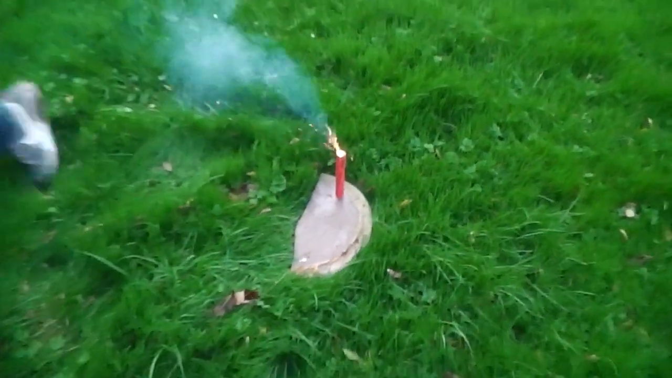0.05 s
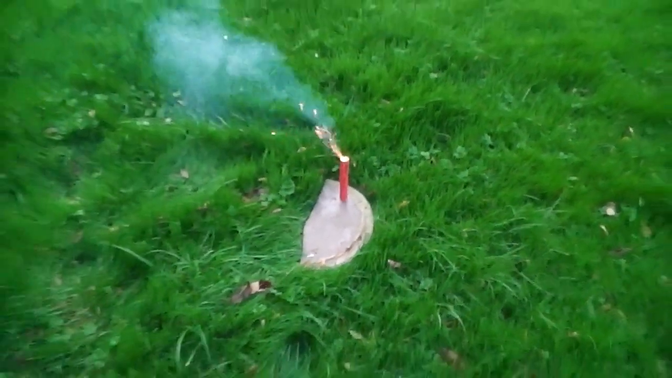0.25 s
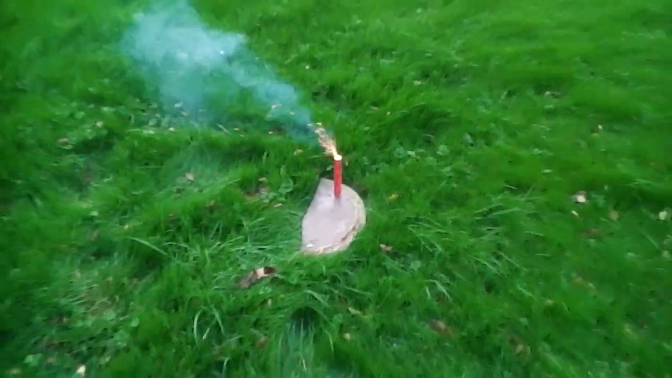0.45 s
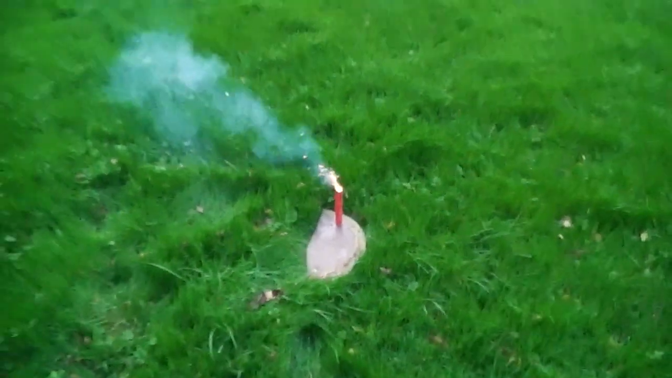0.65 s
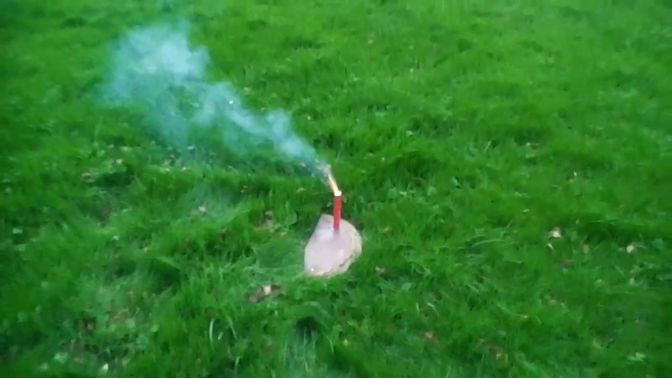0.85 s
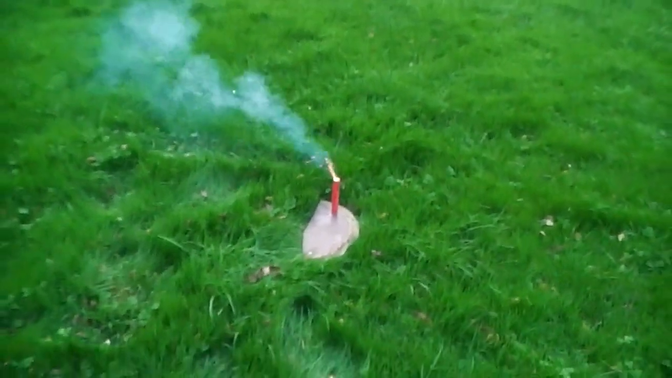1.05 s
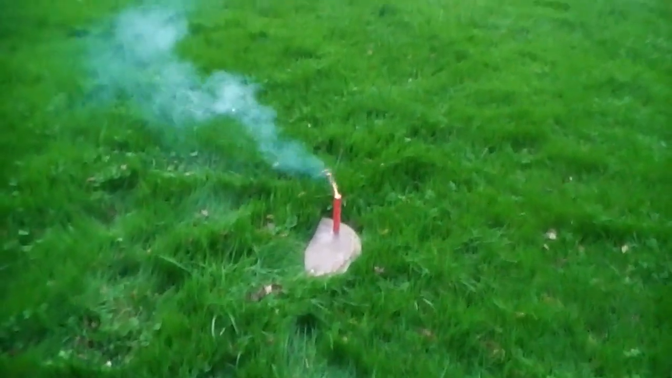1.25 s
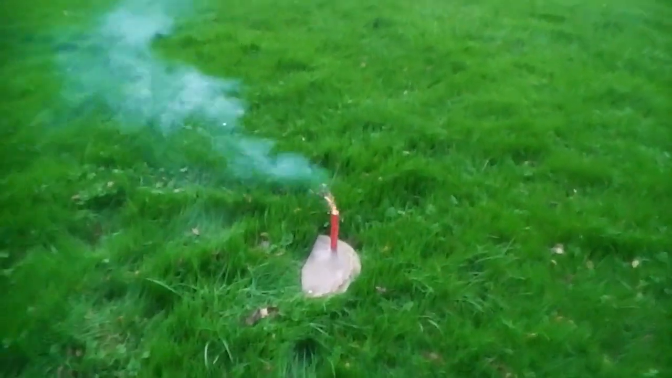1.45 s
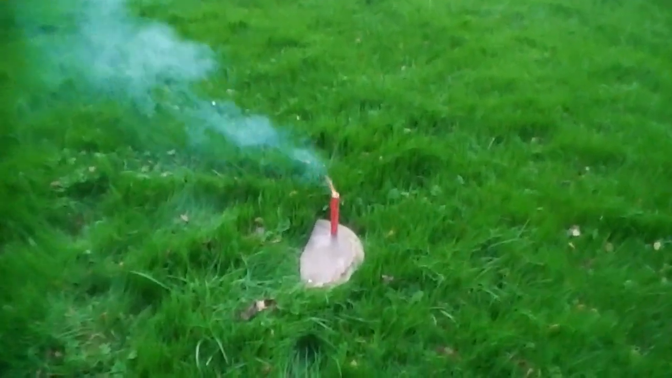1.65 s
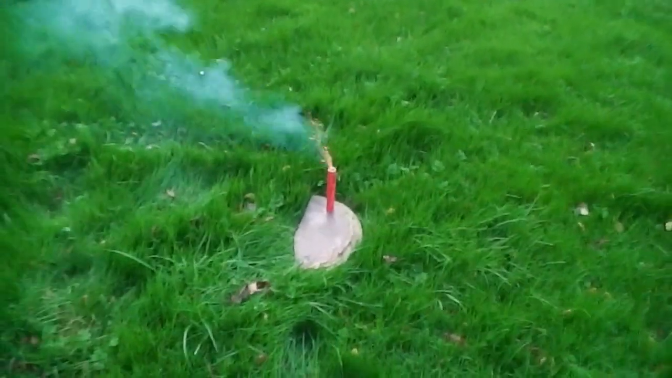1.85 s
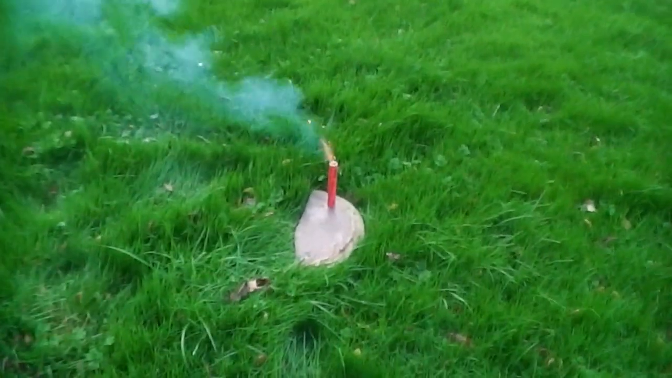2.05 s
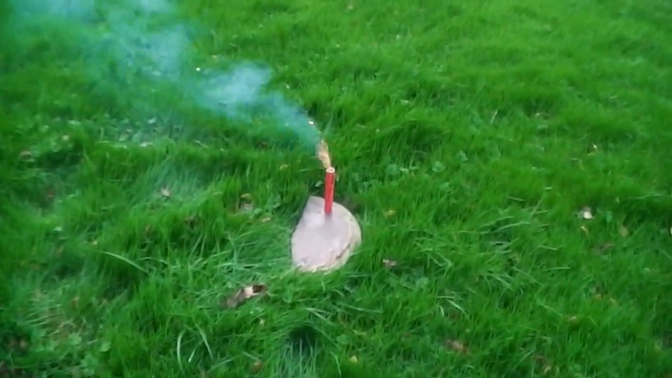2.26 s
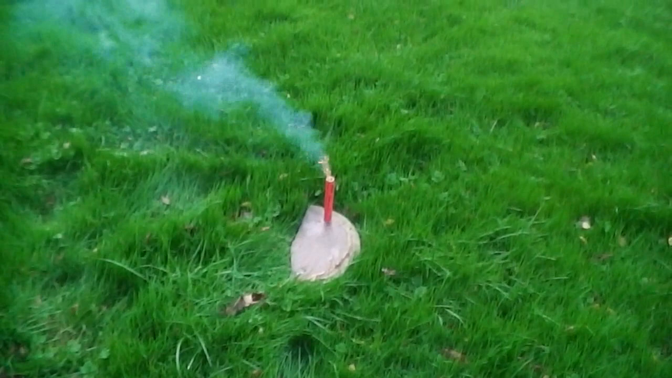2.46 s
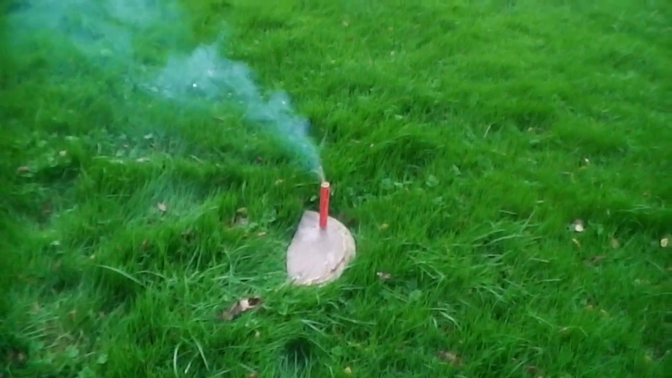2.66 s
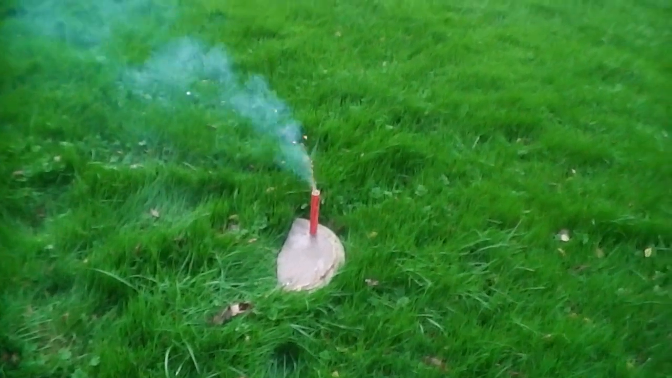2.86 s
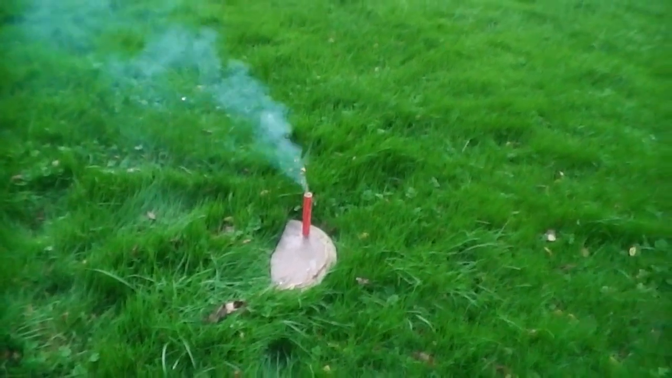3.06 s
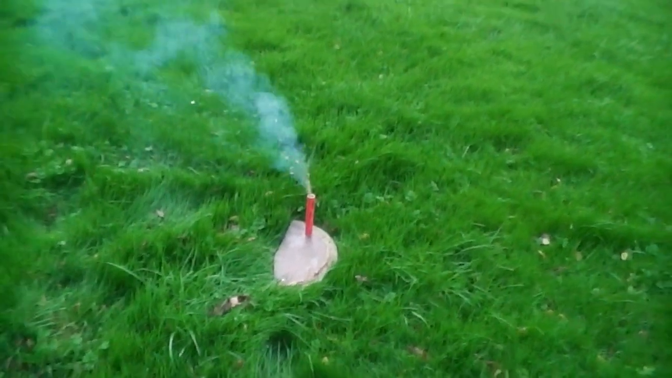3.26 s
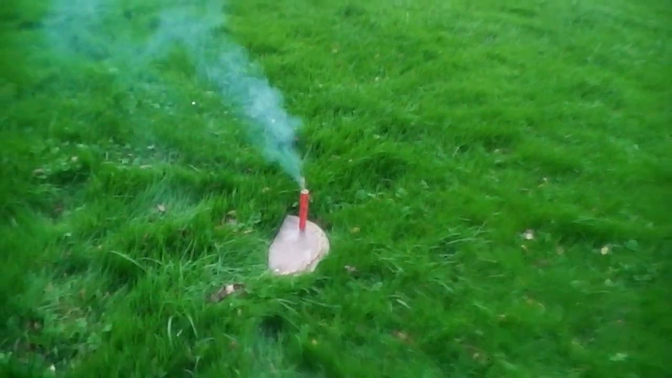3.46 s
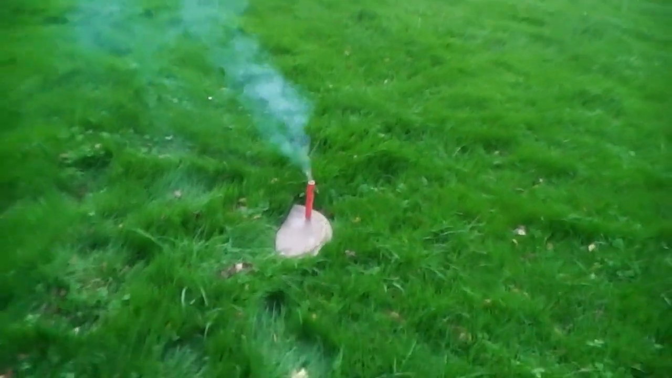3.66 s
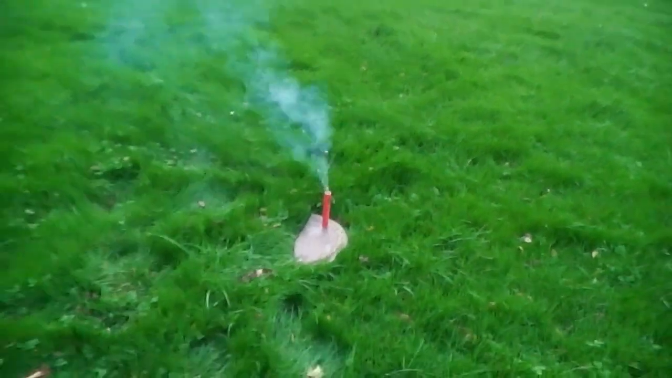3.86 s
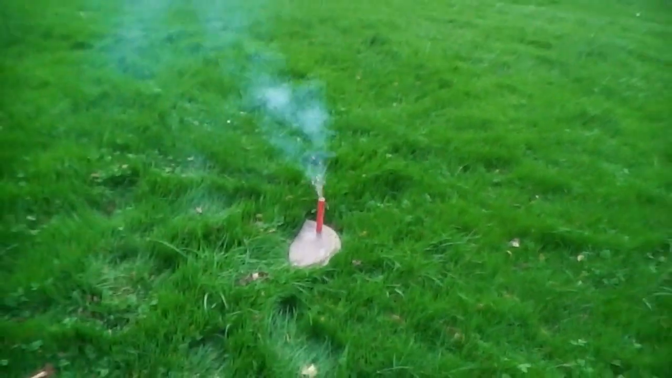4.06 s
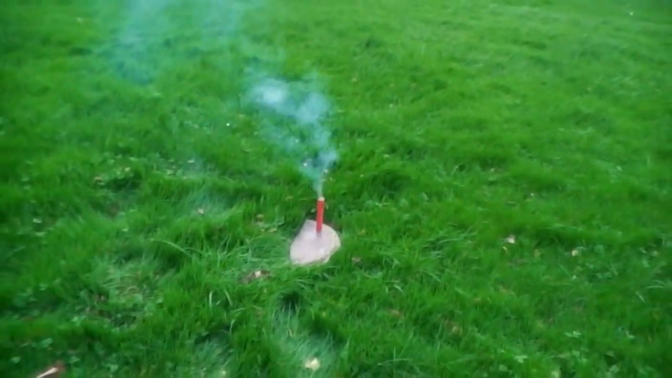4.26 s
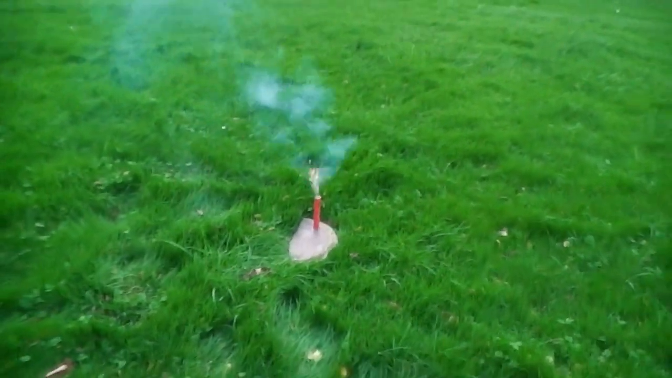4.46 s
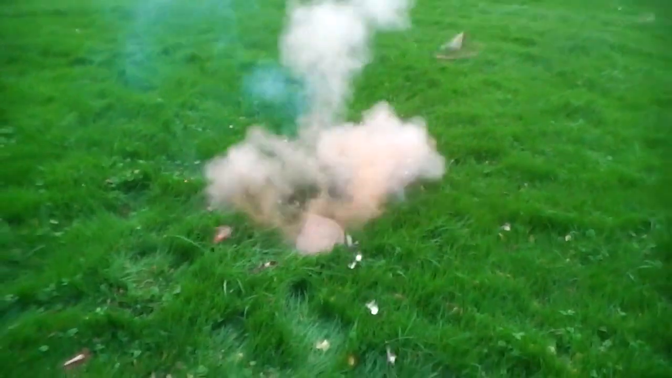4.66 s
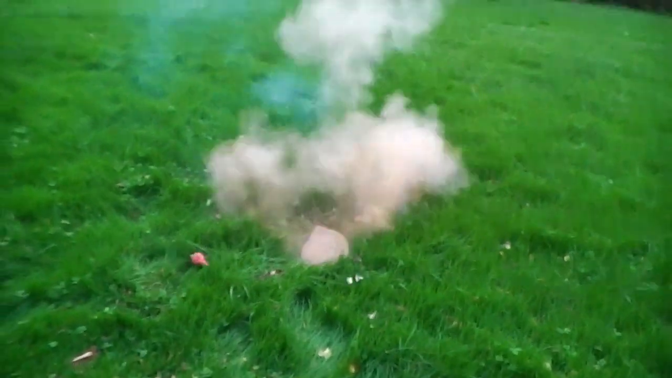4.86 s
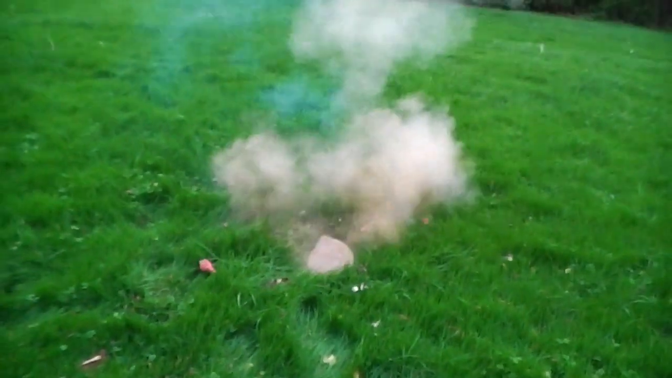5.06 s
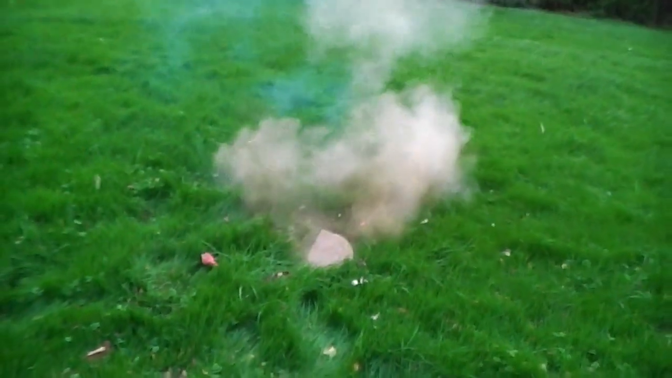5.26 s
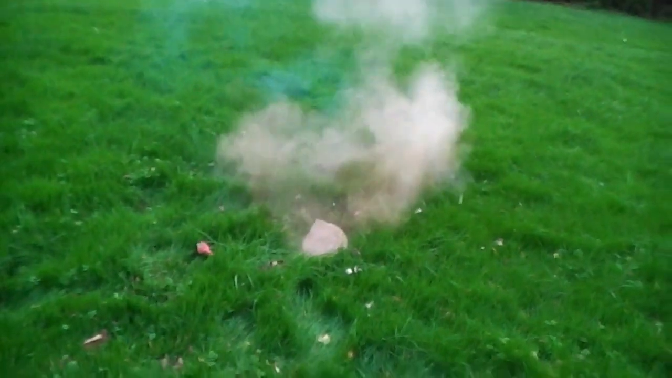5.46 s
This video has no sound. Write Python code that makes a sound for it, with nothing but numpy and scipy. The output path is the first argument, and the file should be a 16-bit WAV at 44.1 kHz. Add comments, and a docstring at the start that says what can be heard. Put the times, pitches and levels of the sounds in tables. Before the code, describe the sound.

A few soft steps scuff through grass as a firecracker fuse hisses with a thin, slightly whistling edge, nearby at first and slowly receding. After about four and a half seconds the hiss surges and a single sharp bang cuts it off, briefly overloading the microphone. Small bits of tube and soil tap the ground, and a much quieter echo returns from the right over faint outdoor air.

```python
"""On an open lawn, a firecracker's fuse hisses while someone steps back through the grass.
The fuse jets gas through a narrow tube that colours the hiss, then flares as the fire reaches the charge.
The charge bursts with a thump and one crack, loud enough to overload the microphone.
Scraps patter down, and the bang rolls back from distant trees on the right over faint open air."""
import sys
import numpy as np
from scipy import signal
from scipy.fft import rfft, irfft
from scipy.io import wavfile

SR = 44100
rng = np.random.default_rng(int(sys.argv[2]) if len(sys.argv) > 2 else 0)


def log_audio(samples):
    """Write samples as a 16-bit WAV file to the path given in sys.argv[1]."""
    # one column per channel
    frames = np.atleast_2d(samples).T
    # limit to full scale, then quantise
    limited = np.clip(frames, -1, 1)
    pcm = np.round(limited * 32767).astype(np.int16)
    wavfile.write(sys.argv[1], SR, pcm)


N = 243431
TIME = np.arange(N) / SR
BANG_S = 4.5013


# tone of the ground's short answer to the burst: (frequency [Hz], level [dB])
GROUND_TONE = [(50, -11.5), (180, -18), (400, 0.5), (700, 3), (1500, -5.5), (3000, -25.5), (10000, -30),
               (16000, -32.5)]
# how alike left and right are in the burst: (frequency [Hz], likeness [0-1])
BANG_LIKENESS = [(50, 0.9), (250, .7), (550, 0.25), (1200, 0.69), (2500, 0.71), (8000, 0.69), (15000, 0.83)]
def bang(crack_db=-10, shock_db=-8, shock_s=0.00084, thump_hz=130, ground_db=-24):
    """The charge bursts: a deep pressure thump, a crack of torn air and a gritty answer from the ground."""
    shock = -from_db(shock_db) * (TIME >= BANG_S) * np.exp(-since(BANG_S) / shock_s)
    thump = signal.sosfilt(signal.butter(1, [25, thump_hz], "band", fs=SR, output="sos"), shock)
    grit = noise(BANG_LIKENESS, GROUND_TONE) * flicker(600, depth_db=2.5)
    ground = from_db(ground_db) * grit * dying(BANG_S, fade_s=0.093)
    return thump + from_db(crack_db) * torn_air() + ground


# tone of the crack: (frequency [Hz], level [dB])
CRACK_TONE = [(170, -20), (340, -0.5), (480, -4.5), (620, -6), (800, -3), (1100, -2.5), (1300, 0.5),
              (1550, 2.5), (2000, -11.5), (2700, -18.5), (4500, -8.5), (9000, -16.5), (16000, -21.5)]
# which side the crack leans to: (frequency [Hz], left minus right [dB])
CRACK_PAN = [(100, 1.5), (200, -1.5), (380, -1), (700, -8.5), (1300, -1), (2400, -0.5), (4400, 0.5)]
def torn_air(size=256):
    """Jumbled shock fronts make a six-millisecond crack: all pitches at once, randomly out of step."""
    hz = np.arange(size // 2 + 1) * SR / size
    phase = rng.uniform(0, 2 * np.pi, len(hz))
    phase_gap = np.arccos(np.clip(at_hz(BANG_LIKENESS, hz), 0, 1)) * rng.choice([-1, 1], len(hz))
    sides = np.array([[1], [-1]]) / 2
    strength = (hz > 0) * from_db(at_hz(CRACK_TONE, hz) + sides * at_hz(CRACK_PAN, hz))
    burst = irfft(strength * np.exp(1j * (phase + sides * phase_gap)), size)
    crack = unit_level(burst * signal.windows.tukey(size, .2))
    start = int(BANG_S * SR)
    return np.pad(crack, [(0, 0), (start, N - start - size)])


# the fuse spurts as the listener backs away: (time [s], jet level [dB], tube level [dB])
FUSE_LEVELS = [(0.03, -31.5, -34.5), (0.37, -34, -31), (0.5, -34, -32.5), (0.57, -33, -26.5),
               (0.6, -36.5, -36.5), (0.79, -32.5, -30), (1.69, -32.5, -34.5), (1.81, -30, -30),
               (1.9, -33.5, -34), (2.71, -37, -36), (2.79, -36.5, -35), (3.05, -38.5, -39.5),
               (3.37, -38, -38), (3.46, -41.5, -41), (3.62, -38.5, -39), (3.95, -43, -44),
               (4.05, -41.5, -42.5), (4.38, -45, -43.5)]
# tone of the flame's rush, shared by the trodden grass: (frequency [Hz], level [dB])
RUSH_TONE = [(100, -18.5), (250, -8.5), (500, -3), (900, -0.5), (1900, 1), (2400, 0), (2900, -12),
             (8000, -31)]
# how alike left and right are for nearby sounds: (frequency [Hz], likeness [0-1])
NEAR_LIKENESS = [(50, 0.6), (300, 0.79), (700, 0.82), (1400, 0.93), (2500, 1), (8000, 0.96), (15000, 0.91)]
def fuse(flare_s=4.398, flare_db=5, surge_db=27.5, surge_rise_s=.009, flame_db=-51.5):
    """The sputtering hiss steps up, surges as the fire reaches the charge, and is blown out by the bang."""
    jet_db, tube_db = in_time(FUSE_LEVELS)
    surge = from_db(surge_db) * np.exp(np.minimum(TIME - BANG_S, 0) / surge_rise_s)
    swell_db = 20 * np.log10(from_db(flare_db * (TIME > flare_s)) + surge)
    jet, tube = jet_and_tube()
    jet = from_db(jet_db + 1 + swell_db) * jet
    tube = from_db(tube_db - 0.07 + 0.87 * swell_db) * tube * flicker(45, depth_db=0.7)
    rush_db = flame_db + 0.21 * (jet_db - jet_db.mean()) + 0.68 * swell_db   # partly follows the jet
    rush = from_db(rush_db) * noise(NEAR_LIKENESS, RUSH_TONE) * flicker(40, depth_db=1.5)
    sputter = flicker(430, depth_db=0.5) * flicker(27, depth_db=0.5)   # powder grains, uneven packing
    alight = (TIME < BANG_S) + from_db(-6) * dying(BANG_S, fade_s=0.04)
    return (jet + tube + rush) * sputter * alight


# tone of the gas jet: (frequency [Hz], level [dB])
JET_TONE = [(100, -24), (400, -20.5), (1000, -10.5), (2300, -4.5), (5000, -1.5), (8500, -0.5), (10500, 3),
            (11400, 3.5), (12300, 5.5), (13200, 1.5), (14400, -1), (16000, -8)]
# tone of the tube's ringing at its settled pitch: (frequency [Hz], level [dB])
TUBE_TONE = [(2500, -43.5), (3150, -10.5), (3450, -5), (3750, 0), (4050, 0), (4400, -4.5), (4800, -13),
             (5600, -20), (8000, -40)]
# the tube's pitch glides as the fuse burns in: (time [s], pitch [Hz])
TUBE_PITCH = [(0, 3710), (.6, 4060), (2.8, 3876), (4.5, 3980)]
def jet_and_tube(settled_hz=3980, left_lead_rad=0.48):
    """Escaping gas hisses and makes the narrow tube ring; the ground's reflection colours both."""
    hz, times, jet = signal.stft(noise(NEAR_LIKENESS), SR, nperseg=512)
    tube = signal.stft(noise(NEAR_LIKENESS), SR, nperseg=512)[2]
    hz = hz[:, None]
    reflection_db = ground_reflection(hz, times)
    pitch_hz = np.interp(times, *np.transpose(TUBE_PITCH))
    jet *= from_db(at_hz(JET_TONE, hz) + reflection_db)
    tube *= from_db(at_hz(TUBE_TONE, hz * settled_hz / pitch_hz) + reflection_db)
    tube[0] *= np.exp(1j * left_lead_rad)   # the ringing reaches the left side first
    return [unit_level(signal.istft(voice, SR)[1][:, :N]) for voice in (jet, tube)]


# dips and peaks in the hiss, before they slide or deepen: (frequency [Hz], width [Hz], level [dB])
DIPS_AND_PEAKS = [(2280, 480, 3.5), (3076, 280, -16), (4970, 320, -8.5), (6050, 900, 4.5),
                  (6770, 330, -8.5), (7720, 710, 3.5), (8870, 260, -3.5), (9660, 1700, 2),
                  (10950, 550, -2.5), (11750, 700, 2), (13200, 860, -3.5), (14200, 800, 2.5),
                  (15100, 600, -1.5)]
# where the lowest dip lies as the listener moves: (time [s], frequency [Hz])
LOWEST_DIP = [(0, 2480), (.6, 2770), (1.1, 3030), (3, 3000), (4.5, 3340)]
def ground_reflection(hz, times, resting_dip_hz=2993, back_off_s=0.53):
    """Sound bouncing off the ground carves sliding dips and peaks into the hiss; returns them in dB."""
    slid_hz = hz * resting_dip_hz / np.interp(times, *np.transpose(LOWEST_DIP))
    deeper = .8 * np.exp(-times / back_off_s)   # the dips are deepest while the listener is close
    return sum((db + deeper * min(db, 0)) / (1 + (2 * (slid_hz - centre) / width) ** 2)
               for centre, width, db in DIPS_AND_PEAKS)


# tones of the echo's body, low boom, sharp edge and treble, each: (frequency [Hz], level [dB])
BODY_TONE = [(80, -23.5), (300, -16), (550, -4), (1000, -2), (1600, 1), (2100, -2), (2700, -14),
             (4500, -20), (8000, -62.5)]
BOOM_TONE = [(30, -33.5), (90, -8.5), (170, 0.5), (300, -4), (700, -32.5), (3000, -71)]
EDGE_TONE = [(1500, -32), (3000, -3), (4200, -2), (6000, -7.5), (8000, -23), (14000, -48.5)]
TREBLE_TONE = [(2500, -31), (6000, 3), (12500, -1), (16000, -8.5)]
# echoes that stand out: (time [s], level [dB], pitch [Hz], length [s], pitch spread [ratio])
SINGLE_ECHOES = [(5.011, -54, 1396, .012, 0.5), (5.034, -49.5, 1290, 0.0089, .4),
                 (5.198, -39, 1200, 0.0035, 0.5), (5.3, -47, 1180, 0.016, .4),
                 (5.368, -39.5, 1190, 0.012, 0.42), (5.507, -50, 150, .015, .4)]
# how alike left and right are for distant sounds: (frequency [Hz], likeness [0-1])
FAR_LIKENESS = [(50, 0.97), (1400, 0.88), (3100, 0.31), (7000, 0.5), (15000, .4)]
def rolling_echo(right_db=5, swing_s=0.82):
    """The bang scatters back, first from the lawn around, then from the trees on the right."""
    body = echo_band(BODY_TONE, lawn_db=-49.5, fade_db_per_s=17.5, arrival_db=-52, crest_db=-48)
    body *= flicker(90, depth_db=2.1)
    boom = echo_band(BOOM_TONE, lawn_db=-57.5, fade_db_per_s=25.5, arrival_db=-71, crest_db=-61)
    edge = echo_band(EDGE_TONE, lawn_db=-52, fade_db_per_s=40.5, arrival_db=-63, crest_db=-72)
    treble = echo_band(TREBLE_TONE, lawn_db=-47, fade_db_per_s=111, arrival_db=-87, crest_db=-64.5)
    treble *= flicker(60, depth_db=2)
    echoes = body + boom + edge + treble + puffs(SINGLE_ECHOES, FAR_LIKENESS)
    return echoes * pan(-right_db) ** ramp(BANG_S, swing_s)


def echo_band(tone, lawn_db, fade_db_per_s, arrival_db, crest_db, trees_s=5.005):
    """The lawn's echo dies away; the trees' echo arrives later, moves to its crest level and holds."""
    lawn = from_db(lawn_db - fade_db_per_s * since(BANG_S)) * ramp(BANG_S, rise_s=0.0083)
    trees_db = arrival_db + (crest_db - arrival_db) * ramp(trees_s, rise_s=0.33)
    trees = from_db(trees_db) * ramp(trees_s, rise_s=.01)
    return np.hypot(lawn, trees) * noise(FAR_LIKENESS, tone)


# steps and scuffs: (time [s], level [dB], pitch [Hz], length [s], pitch spread [ratio])
FOOTSTEPS = [(.003, -32.5, 950, .024, .9), (.076, -50.5, 193, .017, 0.33), (.332, -33.5, 1250, 0.01, 0.42),
             (.443, -49, 218, 0.023, 0.47), (.485, -39, 1160, .028, 0.4), (.853, -38, 756, .007, .4),
             (.981, -38, 910, 0.0046, 0.3), (1.057, -48, 291, 0.013, .4), (1.1, -50.5, 314, .04, 0.29),
             (1.46, -47, 654, 0.13, 0.58), (3.45, -51, 750, 0.25, 0.55), (3.819, -33.5, 1700, .008, 1.1),
             (3.84, -47.5, 1050, 0.058, .9), (4.262, -51.5, 444, 0.015, 0.53)]
def feet(start_db=-39, fade_db_per_s=2.5, walk_end_s=1.29, stop_db_per_s=19.5):
    """Grass rustles under retreating feet and fades fast once the walk ends; steps and scuffs stand out."""
    level_db = start_db - fade_db_per_s * TIME - stop_db_per_s * since(walk_end_s)
    rustle = from_db(level_db) * noise(NEAR_LIKENESS, RUSH_TONE) * flicker(30, depth_db=1.5)
    return rustle + puffs(FOOTSTEPS, NEAR_LIKENESS)


# scraps landing: (time [s], level [dB], pitch [Hz], length [s], pitch spread [ratio])
LANDINGS = [(4.561, -44, 1410, 0.0058, 0.45), (4.592, -46, 1490, 0.0075, 1.3), (4.629, -42, 300, .006, .5),
            (4.63, -41, 1150, .0035, .5), (4.687, -56, 600, .012, .5), (4.708, -50, 1000, 0.004, 0.54),
            (4.7585, -41, 1680, 0.0027, 0.28), (4.769, -40.5, 1200, 0.0027, 1.2),
            (4.856, -52, 1700, .003, .45), (5.287, -55, 9000, 0.0032, 0.59)]
def falling_scraps():
    """Bits of tube and soil patter down, a little to the right."""
    return puffs(LANDINGS, FAR_LIKENESS) * pan(left_db=-1.3)


# tone of the open air: (frequency [Hz], level [dB])
AIR_TONE = [(20, -10.5), (50, -3), (100, -2), (200, -5.5), (500, -6.5), (1500, -10.5), (8000, -33)]
def open_air(level_db=-61.5, drop_db=21, hold_s=0.46, return_db_per_s=40):
    """A steady low background that drops away at the bang, stays down a while and creeps back."""
    dip_db = np.maximum(drop_db - return_db_per_s * since(BANG_S + hold_s), 0) * (TIME > BANG_S)
    return from_db(level_db - dip_db) * noise(NEAR_LIKENESS, AIR_TONE)


def puffs(rows, likeness):
    """Dull taps with no clear note: each is a quick rise and fall of noise in a broad band."""
    out, source = np.zeros((2, N)), noise(likeness)
    for start, db, hz, length, spread in rows:
        part = slice(int(start * SR), int((start + 10 * length) * SR))
        age = np.arange(out[:, part].shape[1]) / (length * SR / 2)
        edges_hz = [hz / (1 + spread), min(hz * (1 + spread), SR / 2 - 1)]
        band = signal.butter(2, edges_hz, "band", fs=SR, output="sos")
        puff = signal.sosfilt(band, source[:, part] * np.sqrt(age) * np.exp(-age))
        out[:, part] += from_db(db) * puff * np.sqrt(2 * length * SR / np.sum(puff ** 2))
    return out


def noise(likeness, tone=None):
    """Stereo noise at level 1, with a given left-right likeness and tone."""
    hz = np.arange(N // 2 + 1) * SR / N
    alike = np.clip(at_hz(likeness, hz), 0, 1)
    mid, side = rfft(rng.standard_normal((2, N)))
    both = np.sqrt(1 + alike) * mid + np.sqrt(1 - alike) * side * [[1], [-1]]
    colour = 1 if tone is None else from_db(at_hz(tone, hz))
    return unit_level(irfft(both * colour, N))


def flicker(rate_hz, depth_db):
    """A volume that wanders at random around 1."""
    smoothing = signal.butter(2, rate_hz, fs=SR, output="sos")
    wander = signal.sosfilt(smoothing, rng.standard_normal(N + SR))[SR:]
    return unit_level(from_db(depth_db * unit_level(wander)))


def dying(start, fade_s):
    """Silent until start, then falling by 60 dB every fade_s seconds."""
    return (TIME >= start) * from_db(-60 * since(start) / fade_s)


def ramp(start, rise_s):
    """Climb from 0 to 1 after start, then stay there."""
    return np.minimum(since(start) / rise_s, 1)


def since(start):
    """Seconds gone by since start, zero before it."""
    return np.maximum(TIME - start, 0)


def in_time(rows):
    """Join a table's rows into curves with a value at every sample."""
    times, *columns = np.transpose(rows)
    return [np.interp(TIME, times, column) for column in columns]


def at_hz(points, hz):
    """Read a table between its frequencies, with octaves evenly spaced."""
    frequencies, values = np.transpose(points)
    return np.interp(np.log(hz + 1), np.log(frequencies), values)


def pan(left_db):
    """Left and right volumes; a negative value leans to the right."""
    return from_db(np.array([[left_db], [-left_db]]) / 2)


def from_db(db):
    """Turn decibels into a volume factor."""
    return 10 ** (np.asarray(db) / 20)


def unit_level(x):
    """Scale a signal to an average (rms) level of 1."""
    return x / np.sqrt(np.mean(x ** 2) + 1e-20)


def scene():
    """Fuse, steps, bang, scraps and echo over the open air."""
    scraps = falling_scraps()
    return fuse() * pan(left_db=-.2) + feet() + bang() + scraps + rolling_echo() + open_air()


def record(dry, cutoff_hz=15750):
    """The microphone overloads on the bang, and the highest treble is cut."""
    overloaded = np.tanh(dry)
    return signal.sosfilt(signal.ellip(12, .1, 80, cutoff_hz, fs=SR, output="sos"), overloaded)


dry = scene()
out = record(dry)
log_audio(out)
```